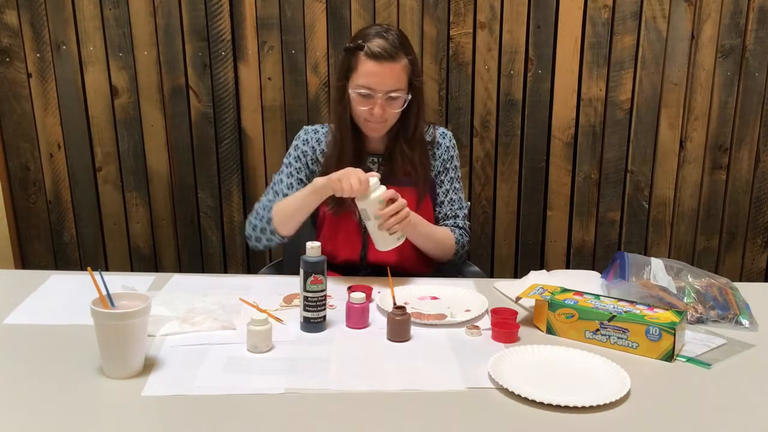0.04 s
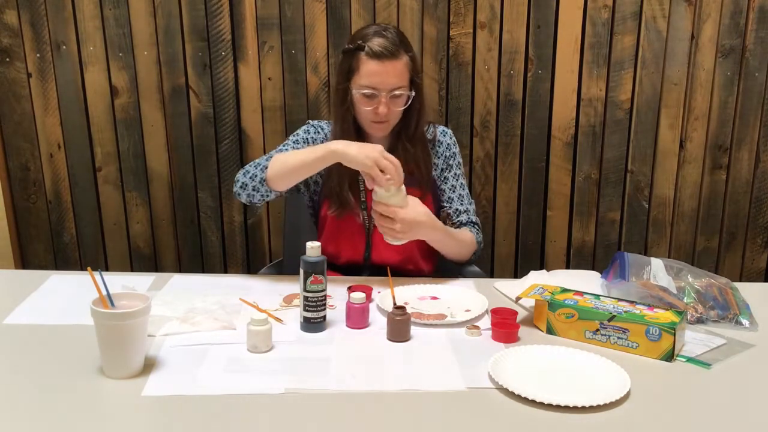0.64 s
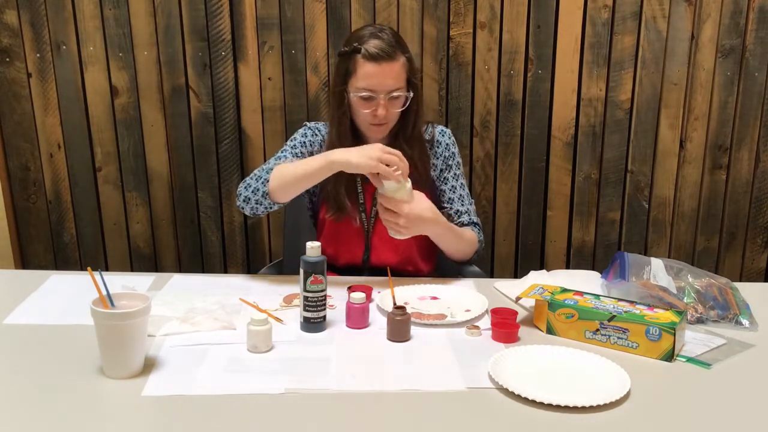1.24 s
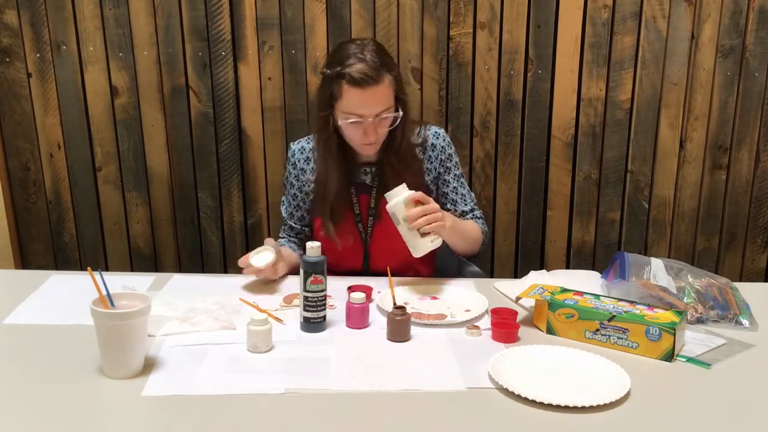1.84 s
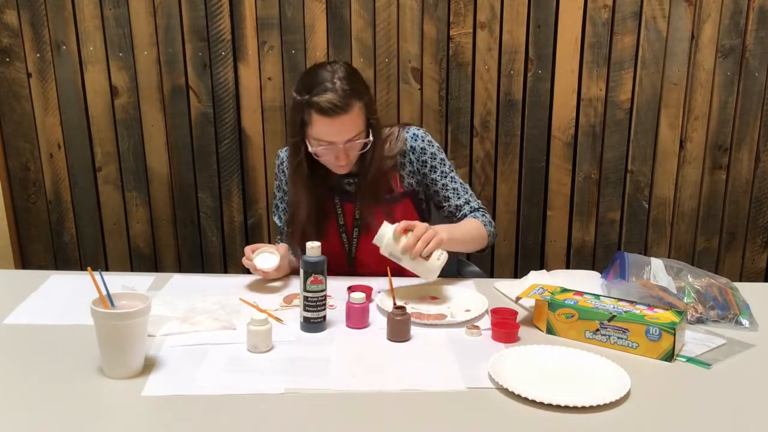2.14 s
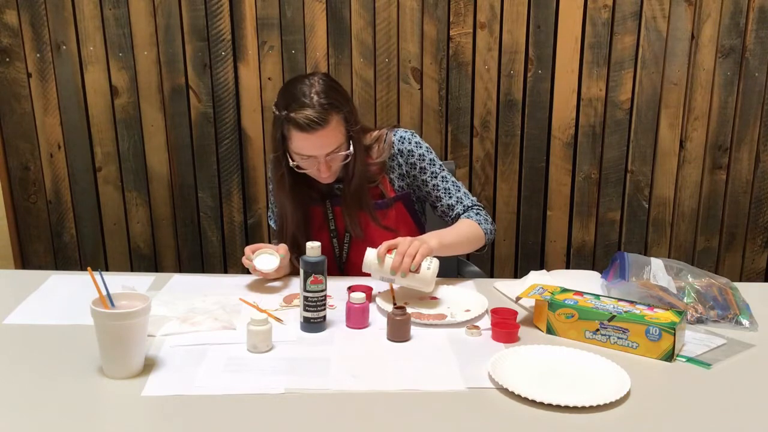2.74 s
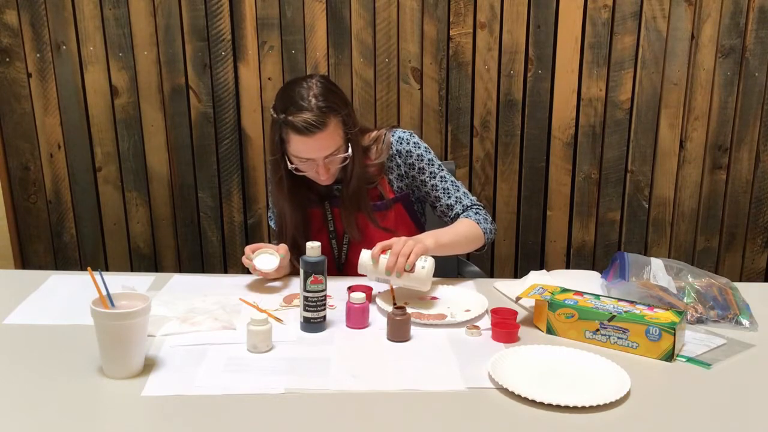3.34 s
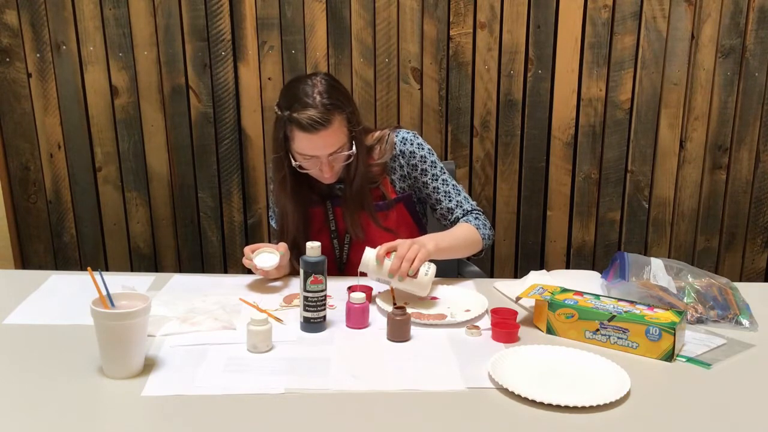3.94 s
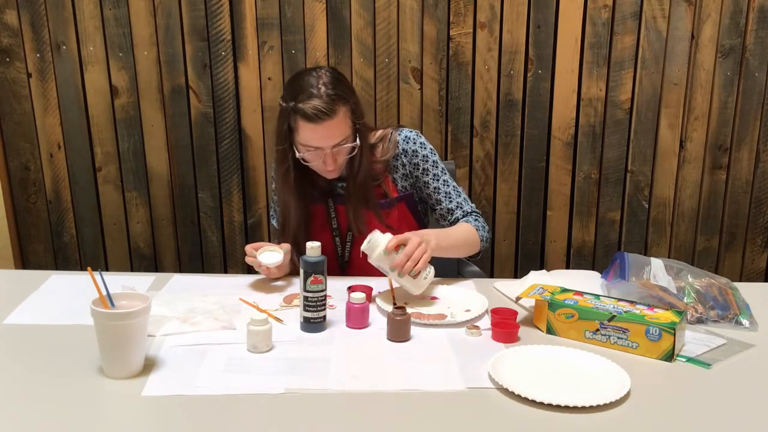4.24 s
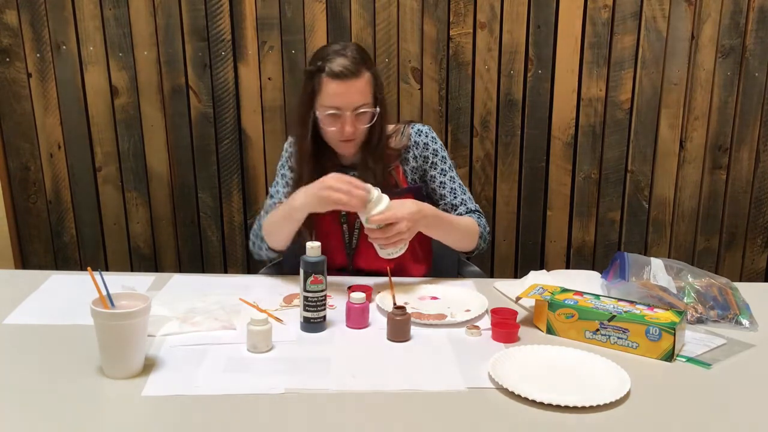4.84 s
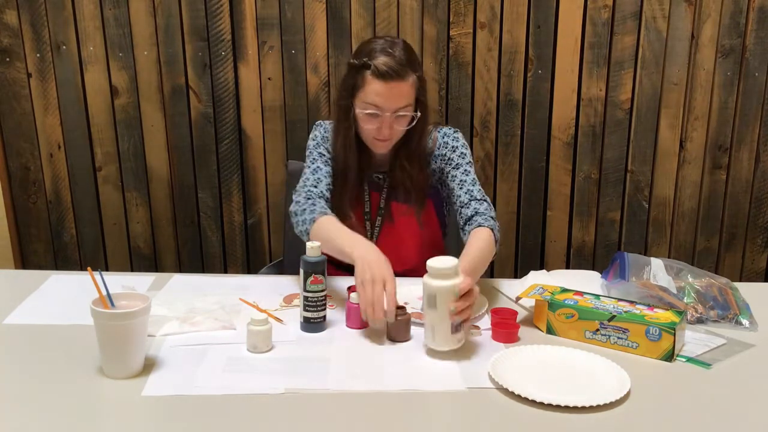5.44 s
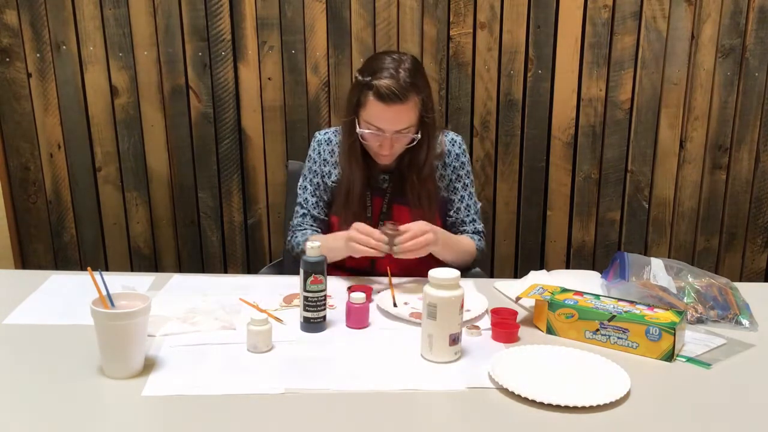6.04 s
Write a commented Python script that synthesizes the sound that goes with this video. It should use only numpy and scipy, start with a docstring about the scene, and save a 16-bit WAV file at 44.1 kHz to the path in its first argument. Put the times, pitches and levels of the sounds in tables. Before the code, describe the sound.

Fans drone in a small room while faint scrapes and clicks of a plastic paint bottle's cap end in one dull knock on a table.

```python
"""The screw cap of a plastic paint bottle is twisted off, then fitted back with a few light clicks.
Its thread grinds and scrapes and fingers rub the plastic: tiny slips that ring the cap and the bottle.
The bottle is set down with a brief rattle and a dull knock that rings the table top.
Throughout, fans drone in the small room, two of them beating slowly over a rush of air."""
import sys
import numpy as np
from scipy import signal
from scipy.fft import rfft, irfft
from scipy.io import wavfile

SR = 44100
rng = np.random.default_rng(int(sys.argv[2]) if len(sys.argv) > 2 else 0)


def unload_audio(sound):
    """Save the sound as a 16-bit wav file, at the path given as the first command line argument."""
    columns = np.transpose(np.atleast_2d(sound))
    # keep every value between -1 and 1, then stretch to whole-number steps
    steps = np.round(np.clip(columns, -1, 1) * 32767)
    wavfile.write(sys.argv[1], SR, steps.astype(np.int16))


N = 267687


def from_db(db):
    """Decibels to gain."""
    return 10 ** (np.asarray(db) / 20)


def rms_one(x):
    """Scale to an rms of 1."""
    return x / np.sqrt(np.mean(x ** 2) + 1e-20)


def add(track, start_s, sound):
    """Mix a sound into the track."""
    start = round(start_s * SR)
    track[start:start + len(sound)] += sound[:N - start]


def coloured_noise(spectrum):
    """Steady noise with the given (Hz, dB) outline; rms 1."""
    hz, db = np.transpose(spectrum)
    bin_hz = np.maximum(np.arange(N // 2 + 1) * SR / N, 1)
    gain = from_db(np.interp(np.log(bin_hz), np.log(hz), db))
    return rms_one(irfft(rfft(rng.standard_normal(N)) * gain, N))


def resonate(force, modes):
    """A force rings parallel (Hz, width, dB) resonances of alternating sign."""
    out = 0
    for k, (hz, width, db) in enumerate(modes):
        radius, angle = np.exp(-np.pi * width / SR), 2 * np.pi * hz / SR
        gain = (-1) ** k * from_db(db) * (1 - radius ** 2) / 2
        poles = [1, -2 * radius * np.cos(angle), radius ** 2]
        out = out + signal.lfilter([gain, 0, -gain], poles, force)
    return out


def grains(count, spread_db):
    """The grit of friction: tiny slips of uneven size."""
    return rng.standard_normal(count) * from_db(spread_db * rng.standard_normal(count))


def pressure(t, slip_s):
    """A sliding contact builds to 1, then lets go."""
    progress = np.maximum(t, 0) / slip_s
    return np.sqrt(2 * progress) * np.exp(.5 ** 2 - progress ** 2)


def burst(start_s, attack_s, hold_s, fade_db_per_s):
    """An envelope: rise, hold, then an even fade."""
    t = np.arange(N) / SR - start_s
    fading_s = np.clip(t - attack_s - hold_s, 0, 1)
    return np.clip(t / attack_s, 0, 1) * from_db(-fade_db_per_s * fading_s)


def friction(force, slips, modes):
    """Slips ring the modes, and the level rides the force."""
    return resonate(force * slips + 1e-18, modes) / np.std(resonate(slips, modes))


def touch(slip_s, modes, db):
    """One short run of slips rings the modes; the level is rms with its energy packed into 10 ms."""
    t = np.arange(SR // 10) / SR
    force = grains(len(t), spread_db=3.5) * pressure(t, slip_s)
    return from_db(db) * rms_one(resonate(force, modes)) / np.sqrt(10)


# The drone of fans and mains. Each row: pitch in Hz, level in dB.
HUM_TONES = [(118.138, -38.9), (114.942, -50.1), (91.6, -59.5), (239.98, -49.8)]
# The colour of the moving air. Each row: frequency in Hz, relative level in dB.
AIR_SPECTRUM = [(48, -35), (66, -21.5), (90, -5.5), (117, -0.5), (138, -3.5), (190, -1), (400, -9),
                (630, -14), (930, -27.5), (1270, -31), (1800, -39.5), (3500, -47), (8000, -71)]

def ventilation(air_db=-43, swell_s=.189):
    """Two fans a few hertz apart throb over mains hum and rushing air."""
    t = np.arange(N) / SR - swell_s
    drone = sum(from_db(db) * np.sqrt(2) * np.cos(2 * np.pi * hz * t) for hz, db in HUM_TONES)
    return drone + from_db(air_db) * coloured_noise(AIR_SPECTRUM)


# The bright ring of the cap's rim. Each row: frequency in Hz, width in Hz, gain in dB.
RIM_MODES = [(4600, 720, -2), (6160, 260, 1), (7160, 890, 1.5), (8430, 680, 7), (9900, 1340, -4)]
# The bottle's wall under the palm. Each row: frequency in Hz, width in Hz, gain in dB.
WALL_MODES = [(1450, 630, 2.5), (2700, 1100, -5.5), (4350, 1200, -5.5)]
# Finger strokes. Each row: start in seconds, length in seconds, rim level in dB, wall level in dB.
FINGER_STROKES = [(.03, .25, -71, -84), (.26, .07, -70.5, -68.5), (.9, .3, -72, -84), (1.42, .1, -73, -79),
                  (2.1, 0.088, -72, -73), (2.775, 0.08, -68.5, -72), (2.96, 0.071, -84, -70),
                  (3.39, .07, -86, -72), (4.025, 0.055, -73, -66.5), (4.52, .12, -75, -82),
                  (4.79, .13, -69, -78), (5.06, 0.46, -71, -70)]

def finger_rubs():
    """Sliding fingers feed fine grains into the cap's rim and the bottle's wall."""
    t = np.arange(N) / SR
    on_rim, on_wall = np.zeros(N), np.zeros(N)
    for start_s, stroke_s, rim_db, wall_db in FINGER_STROKES:
        stroke = pressure(t - start_s, stroke_s)
        on_rim += from_db(rim_db) * stroke
        on_wall += from_db(wall_db) * stroke
    rim = friction(on_rim, grains(N, spread_db=1.5), RIM_MODES)
    wall = friction(on_wall, grains(N, spread_db=0.5), WALL_MODES)
    return rim + wall


# The bottle, damped by the gripping hand. Each row: frequency in Hz, width in Hz, gain in dB.
GRIPPED_MODES = [(332, 196, 5.5), (593, 370, -1), (1190, 83, -5.5), (1500, 1200, -26), (2780, 110, -16),
                 (3300, 2200, -38.5)]

def thread_grind(level_db=-43.5):
    """The stiff thread judders as the tight cap starts to turn."""
    force = from_db(level_db) * burst(start_s=.146, attack_s=.007, hold_s=0.031, fade_db_per_s=260)
    return friction(force, grains(N, spread_db=3.0), GRIPPED_MODES)


# The thread's fine, high scratch. Each row: frequency in Hz, width in Hz, gain in dB.
SCRATCH_BANDS = [(12500, 3600, 0), (14800, 2000, -22)]
# Short scrapes. Each row: start in seconds, length in seconds, rim level in dB, scratch level in dB.
SCRAPE_HITS = [(.157, 0.017, -59.5, -78), (.261, 0.019, -62, -68), (.439, 0.013, -76, -72),
               (.467, .012, -69, -68), (.645, .006, -64, -78), (.879, .007, -65, -82),
               (1.188, 0.0087, -64, -70), (2.115, .03, -70, -73), (4.878, .004, -75, -76),
               (5.168, .01, -66, -77), (5.554, .01, -62, -79)]

def scrapes():
    """Plastic catches on plastic or paper, scratching finely and ringing the rim."""
    out = np.zeros(N)
    for start_s, slip_s, rim_db, scratch_db in SCRAPE_HITS:
        add(out, start_s, touch(slip_s, RIM_MODES, rim_db) + touch(slip_s, SCRATCH_BANDS, scratch_db))
    return out


# The bottle's hollow body. Each row: frequency in Hz, width in Hz, gain in dB.
BODY_MODES = [(1290, 91, 6.5), (1850, 510, -9), (2800, 1100, -20), (4600, 480, -16)]
# The cap snaps off or onto the neck. Each row: snap time in seconds, levels of body, rim, scratch
# and drag in dB, then the rim's pitch ratio and damping ratio, which change with the grip.
CLICK_HITS = [(1.2912, -78, -53.5, -71, -56, 0.98, 0.55), (4.725, -53, -66, -86, -82, 0.93, 1.4),
              (4.831, -66, -56, -79, -63, 0.94, 0.87), (4.929, -70, -57, -78, -65, 1.01, 0.93),
              (5.066, -59, -61, -73, -62, 1.05, 1.8)]

def cap_clicks(drag_s=0.0074, drag_lead_s=.013, snap_s=0.0037, rebound_s=0.0053, rebound_after_s=.022):
    """The rim drags over the neck, snaps against the bottle and rebounds once, softer."""
    out = np.zeros(N)
    for at_s, body_db, rim_db, scratch_db, drag_db, pitch, damping in CLICK_HITS:
        rim = [(hz * pitch, width * damping, db) for hz, width, db in RIM_MODES]
        drag = touch(drag_s, rim, drag_db) + touch(drag_s, SCRATCH_BANDS, drag_db - 18)
        add(out, at_s - drag_lead_s, drag)
        for modes, db in ((BODY_MODES, body_db), (rim, rim_db), (SCRATCH_BANDS, scratch_db)):
            add(out, at_s, touch(snap_s, modes, db))
            add(out, at_s + rebound_after_s, touch(rebound_s, modes, db - 8))
    return out


# The ring of the plastic base. Each row: frequency in Hz, width in Hz, gain in dB.
BASE_MODES = [(783, 45, 3.5), (964, 45, -3), (1080, 85, -1), (1376, 80, -1), (1480, 78, -6),
              (2300, 740, -19)]

def base_rattle(level_db=-46.5, muffle_hz=1700):
    """The base rattles briefly as it settles; the paper under it takes off the treble."""
    paper = signal.butter(2, muffle_hz, fs=SR, output="sos")
    contacts = signal.sosfilt(paper, grains(N, spread_db=3.5))
    force = from_db(level_db) * burst(start_s=5.559, attack_s=0.0019, hold_s=0.014, fade_db_per_s=600)
    return friction(force, contacts, BASE_MODES)


# Table top and filled bottle ringing together.
# Each row: frequency in Hz, level in dB, seconds to fade by 60 dB.
TABLE_MODES = [(214.5, -17.5, 0.18), (281.3, -22.5, 0.21), (393, -30.5, 0.079), (432, -43, .1)]
# The base lands, edge first and then flat. Each row: start in seconds, level in dB.
LANDING_HITS = [(5.563, 0.5), (5.5657, -5.5)]

def table_knock(contact_s=0.0011, low_cut_hz=170):
    """Two soft pushes set the table ringing; the top radiates no deep bass."""
    out, t = np.zeros(N), np.arange(SR // 2) / SR
    ringing = sum(from_db(db - 60 * t / t60) * np.sin(2 * np.pi * hz * t) for hz, db, t60 in TABLE_MODES)
    push = np.sin(np.pi * np.minimum(t / contact_s, 1))
    knock = signal.fftconvolve(ringing, push / push.sum())[:len(t)]
    for start_s, db in LANDING_HITS:
        add(out, start_s, from_db(db) * knock)
    return signal.sosfilt(signal.butter(2, low_cut_hz, "high", fs=SR, output="sos"), out)


def room(direct, wet_db, predelay_s=0.0046, t60_s=0.21):
    """Direct sound, then a short diffuse tail off the wooden walls."""
    t = np.arange(SR // 2) / SR
    tail = rng.standard_normal(len(t)) * from_db(-60 * t / t60_s) * (t > predelay_s)
    reverb = signal.fftconvolve(direct, tail / np.linalg.norm(tail))[:N]
    return direct + from_db(wet_db) * reverb


def scene():
    """Roomy handling and a drier knock sit on a bed of ventilation, in mono."""
    plastic = cap_clicks() + scrapes() + thread_grind() + finger_rubs() + base_rattle()
    handling = from_db(-2.0) * room(plastic, wet_db=-2.5)
    knock = room(table_knock(), wet_db=-18.0)
    return (handling + knock + ventilation())[None]


# The colour of the microphone's hiss. Each row: frequency in Hz, relative level in dB.
HISS_SPECTRUM = [(40, 7.5), (1500, -1.5), (3500, -0.5), (6500, 0), (7600, 2.5), (8500, 5.5), (9500, 0.5),
                 (11300, -4.5), (15700, -7.5)]

def record(dry, hiss_db=-67.5, low_cut_hz=65, high_cut_hz=15750):
    """The microphone adds faint hiss; deep bass and the very top are cut steeply."""
    low_cut = signal.butter(4, low_cut_hz, "high", fs=SR, output="sos")
    high_cut = signal.ellip(12, .1, 90, high_cut_hz, fs=SR, output="sos")
    hiss = from_db(hiss_db) * coloured_noise(HISS_SPECTRUM)
    return signal.sosfilt(high_cut, signal.sosfilt(low_cut, dry) + hiss)


dry = scene()
out = record(dry)
unload_audio(out)
```